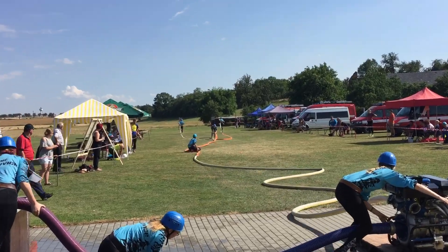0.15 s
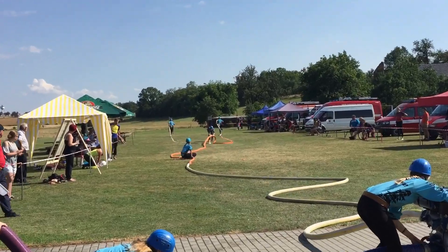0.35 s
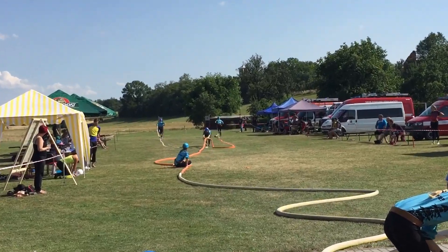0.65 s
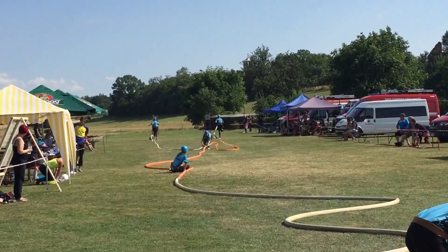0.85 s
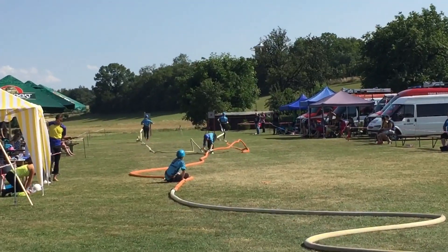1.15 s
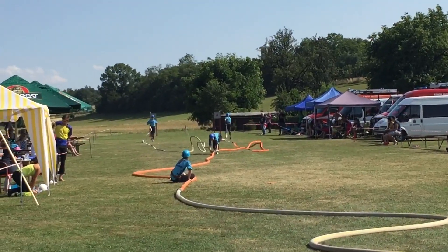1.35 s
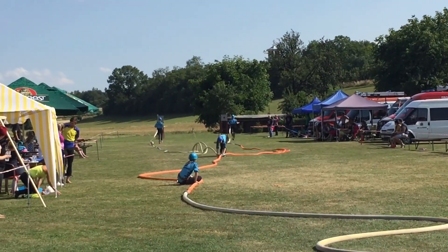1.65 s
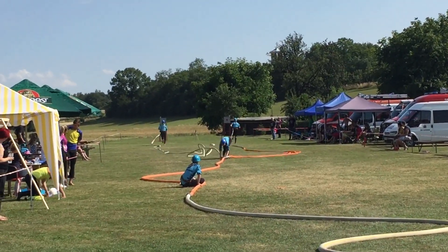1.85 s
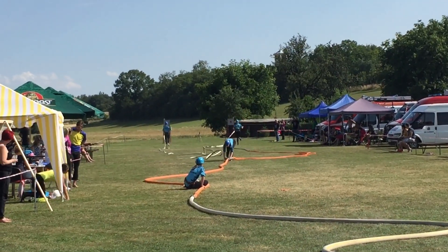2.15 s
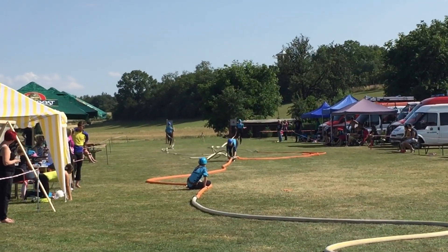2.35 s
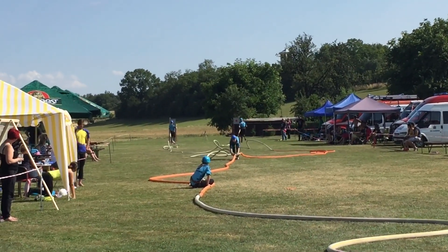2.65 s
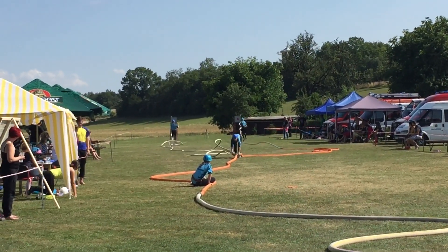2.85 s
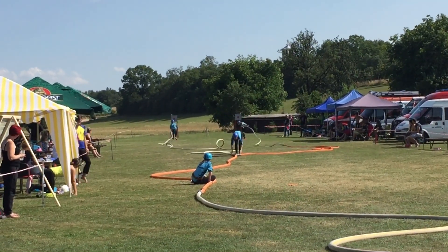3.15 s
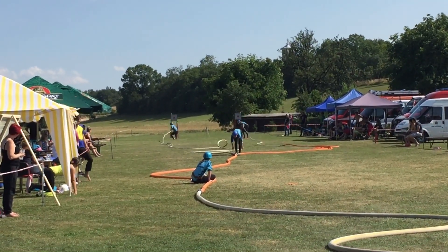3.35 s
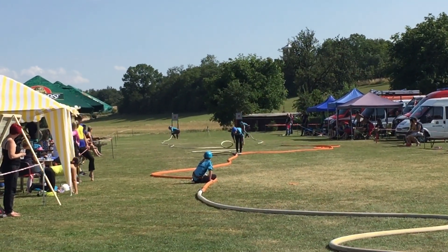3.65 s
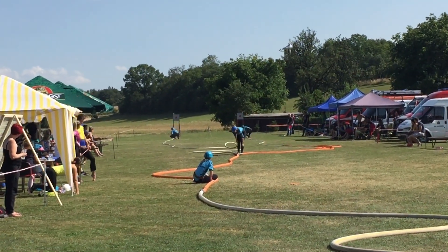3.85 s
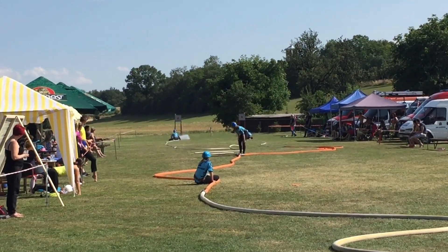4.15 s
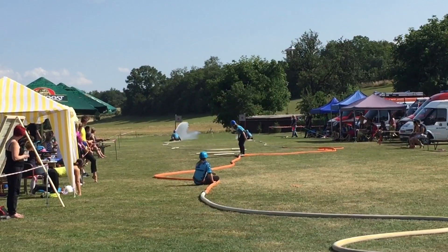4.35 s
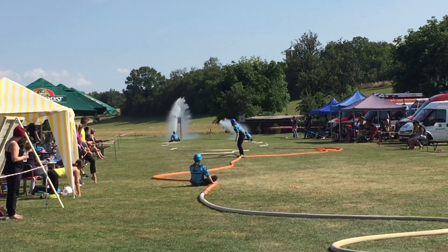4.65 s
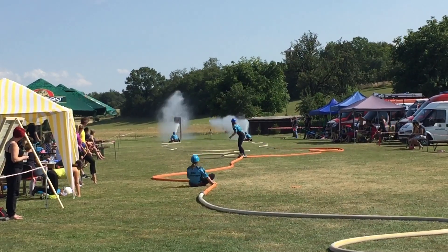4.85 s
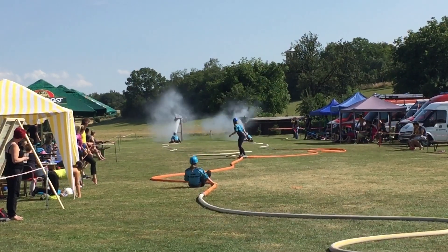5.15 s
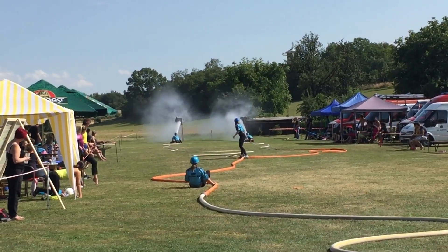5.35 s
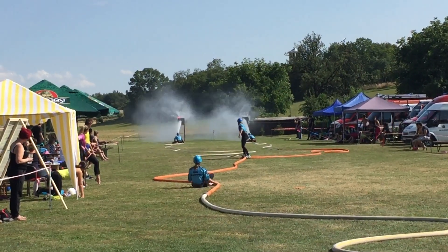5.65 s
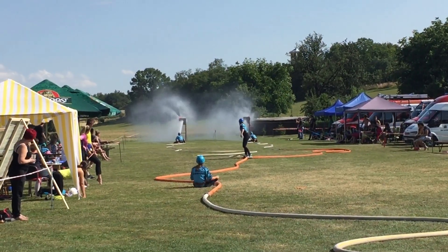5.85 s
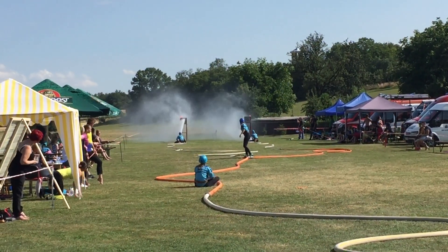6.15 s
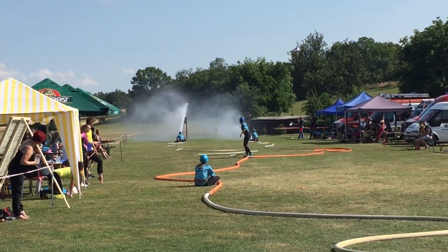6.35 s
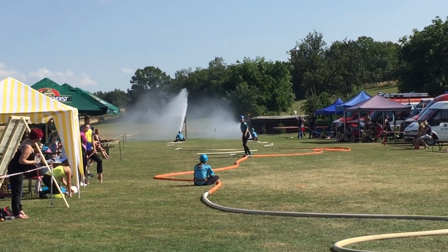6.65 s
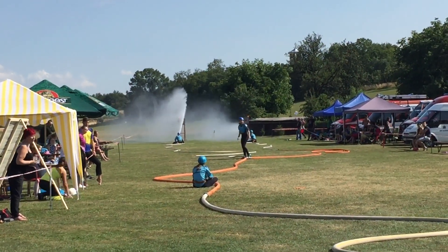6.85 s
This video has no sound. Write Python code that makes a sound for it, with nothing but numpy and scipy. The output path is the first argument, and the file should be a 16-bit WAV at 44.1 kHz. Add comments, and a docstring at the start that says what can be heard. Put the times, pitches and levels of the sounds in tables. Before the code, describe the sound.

Small petrol engine running fast in the open, steady rattling drone rising in pitch and loudness under load, air thumping the microphone, then sudden drop.

```python
"""A petrol fire pump with four cylinders runs hard in the open, pulls up to full load, then is throttled back.
Two exhaust puffs a turn make the drone, built from sine waves locked to the crankshaft.
Every firing knocks and rasps through the resonances of engine and frame, and valves tick between.
At full load gusts of air buffet the microphone; steady air noise from the silencer lies under it all."""
import sys
import numpy as np
from scipy import signal
from scipy.fft import rfft, irfft
from scipy.io import wavfile
from scipy.ndimage import uniform_filter1d

SR = 44100
rng = np.random.default_rng(int(sys.argv[2]) if len(sys.argv) > 2 else 0)


def log_audio(samples):
    """Write samples as a 16-bit WAV file to the path given in sys.argv[1]."""
    # one column per channel
    frames = np.atleast_2d(samples).T
    # limit to full scale, then quantise
    limited = np.clip(frames, -1, 1)
    pcm = np.round(limited * 32767).astype(np.int16)
    wavfile.write(sys.argv[1], SR, pcm)


N = 308259
TIME = np.arange(N) / SR  # seconds

# how fast the crankshaft spins: t/s, turns a second f/Hz
CRANK_SPEED = [(0.0, 63.06), (0.93, 64.54), (1.42, 64.26), (1.75, 63.45), (2.1, 67.4), (2.41, 68.47),
               (3.15, 70.2), (3.31, 70.56), (3.7, 67.3), (4.34, 67.17), (4.96, 73.98), (5.3, 76.9),
               (5.61, 79.04), (6.19, 79.72), (6.33, 76.4), (6.5, 71.9), (6.76, 68.3), (6.99, 65.3)]
# how hard the charges burn: t/s, effort level/dB
BURN_EFFORT = [(0.05, -17.5), (0.22, -18), (1.34, -18), (1.65, -20.5), (1.87, -17.5), (3.16, -17),
               (3.47, -18), (3.59, -21), (4.36, -19.5), (5.21, -11.5), (6.29, -13), (6.45, -23.5),
               (6.62, -23.5), (6.83, -27.5), (6.97, -23.5), (6.99, -24)]
# strong exhaust orders: multiple of crank speed, change with the throttle closed level/dB
STRONG_ORDERS = [(2, -3), (4, -7), (6, -4)]
# weaker exhaust orders: multiple of crank speed, then level/dB against order 4
# at light load, at full load, with the throttle closed
WEAK_ORDERS = [(1, -31.5, -17, -20), (3, -12, -19.5, -1.5), (5, -20.5, -16, -13), (7, -14.5, -39, -14),
               (8, -16.5, -19.5, -16), (10, -27, -13.5, -27), (12, -25.5, -36, -12), (13, -16, -31, -17),
               (14, -12.5, -22, -25), (17, -18, -11, -22)]
# resonances of the silencer, which the strong exhaust orders slide through: f/Hz, level/dB
SILENCER_RESONANCES = [(128, -5.5), (140, -4.5), (151, -5), (160, 0), (256, 1.15), (269, 1.06), (280, -2.5),
                       (305, -4.5), (319, 0.5), (382, -5.5), (403, -3), (420, -1), (457, -1), (478, -5.5)]
# cylinders in firing order: lateness at light load t/ms, blow at light load level/dB, at full load level/dB
CYLINDER_BLOWS = [(0.0044, 5.5, 5), (0.11, -0.5, -1), (0.065, 7.5, 3.5), (0.15, -5, -0.5)]
# resonances of engine block, silencer shell and frame: f/Hz, width f/Hz, level/dB
BLOCK_RESONANCES = [(682, 164, -3.5), (890, 66, -2), (1151, 150, -4), (1323, 73, -2.5), (1372, 114, -3.5),
                    (1765, 95, -5.5), (1973, 68, 0.5), (2388, 137, -0.9), (2647, 42, -2.5),
                    (3025, 160, -3.5), (3176, 230, -4.5), (3553, 170, -3), (3920, 61, -6),
                    (4540, 83, -12.5), (5093, 54, -11), (5580, 250, -10), (5935, 185, -5.5),
                    (6650, 210, -11), (7730, 100, -17), (8490, 136, -16), (9210, 240, -19),
                    (12130, 500, -22), (14600, 1100, -23.5)]
# spectrum of the air noise from the silencer: f/Hz, level/dB
AIR_SPECTRUM = [(20, -17), (50, -16), (110, -2.5), (250, 3), (420, 1), (560, -2), (900, -15), (2000, -34),
                (8000, -60)]
# pulses of air that thump the microphone, often one engine cycle apart: t/s, peak level/dB
AIR_THUMPS = [(4.903, -18), (5.323, -2), (5.347, -0.5), (5.373, -10), (5.489, -6.5), (5.590, -4.5),
              (5.615, -8), (5.681, -16), (5.718, -2.5), (5.768, -2), (5.792, -8), (5.831, -8), (5.869, -6),
              (5.894, -9), (5.918, -8), (5.942, -2), (6.020, -4), (6.069, -2), (6.094, -3), (6.110, -6),
              (6.171, -10), (6.203, -9), (6.26, -11)]
# spectrum of the turbulence around the thumps: f/Hz, level/dB
TURBULENCE_SPECTRUM = [(15, -36), (28, -10), (42, 0), (70, -8), (120, -7), (220, -7), (350, -20),
                       (600, -13), (1500, -61), (5000, -80)]

CRUISE_DB = -18  # burn effort at cruise
# the pump's load grows with the square of its speed, from none to full
NO_LOAD_HZ, FULL_LOAD_HZ = 58.6, 81.2
# the throttle is shut at this moment and the manifold empties
SHUT_S, EMPTYING_S = 6.23, 0.22
# each layer: level at cruising effort in dB, and dB gained per dB of effort
PIPE_DB, PIPE_RISE = -18.5, 0.41  # before the silencer's resonances
KNOCK_DB, KNOCK_RISE = -18, 0.94
CLATTER_DB, CLATTER_RISE = -21.5, 0.76
AIR_DB, AIR_RISE = -33.5, 0.18
CLATTER_SHUT_DB = -4  # change with the throttle closed
# turbulence around each thump: level against the thump, smoothing of its rise, dying away
SWIRL_DB, SWIRL_SMOOTHING_S, SWIRL_DECAY_S = -20, 0.02, 0.048
TOP_HZ = 15700  # no treble gets through above this


def exhaust(turns, crank_hz, effort_db, load, overrun):
    """Rounded puffs, two a turn, a quarter turn after each knock; an order swells as it meets a resonance."""
    pipe_db = PIPE_DB + PIPE_RISE * effort_db
    order_db = []
    for k, closed_db in STRONG_ORDERS:
        resonance_db = np.interp(round(k) * crank_hz, *np.transpose(SILENCER_RESONANCES))
        order_db.append(pipe_db + resonance_db + closed_db * overrun)

    # the puffs come slightly unevenly
    angle = 2 * np.pi * (turns - 0.24 + 0.00035 * walk(50))
    drone = 0
    for (k, _), db in zip(STRONG_ORDERS, order_db):
        drone = drone + undb(db + 0.06 * walk(30)) * np.cos(round(k) * angle)

    order_4_db = order_db[1]
    for k, light_db, full_db, closed_db in WEAK_ORDERS:
        open_db = light_db + (full_db - light_db) * load
        db = open_db * (1 - overrun) + closed_db * overrun
        drone = drone + undb(order_4_db + db + 0.68 * walk(14)) * np.cos(round(k) * angle)
    return np.sqrt(2) * drone  # each sine's level counts as rms


def firings(turns, load):
    """Times and strengths of the firings; under load the cylinders hit more alike and more punctually."""
    count = np.arange(int(2 * turns[-1]))  # two firings a turn
    times = np.interp(count / 2, turns, TIME)
    pull = np.interp(times, TIME, load)
    late_ms, light_db, full_db = np.array(CYLINDER_BLOWS)[count % len(CYLINDER_BLOWS)].T
    late_chance, blow_chance = rng.standard_normal((len(count), 2)).T
    times = times + (late_ms + 0.065 * late_chance) * (1 - 0.83 * pull) / 1000
    blow_db = light_db + (full_db - light_db) * pull + 0.39 * blow_chance
    return times, undb(blow_db)


def knock(blows, load, overrun):
    """Each firing rings the block and lets out a rasp of gas; pump and fan whirr on when the throttle shuts."""
    # the low thud is spread longer than the higher crack
    thud = steady(band(ring(scatter(blows, decay_s=0.0043)), 738, 1570))
    crack = steady(band(ring(scatter(blows, decay_s=0.0022)), 1503, 3970))
    gas = fade(blows, decay_s=0.0042) * rng.standard_normal(N)
    rasp = steady(band(ring(gas), 1250, 4000, order=2))
    whirr = steady(band(ring(rng.standard_normal(N)), 730, 4200))

    # only the balance between the parts matters: the mix is levelled at the end
    mix = undb(-2.5 - 1.4 * load) * thud
    mix = mix + undb(-5 + 4.75 * load) * crack
    mix = mix + undb(-1 - 10 * load) * rasp
    mix = mix + undb(-5.5 - 7 * load + 9 * overrun) * whirr
    return steady(mix)


def clatter(times, sizes, turns, load, overrun):
    """The bright, uneven side of each blow, with valves ticking late in every turn."""
    uneven_sizes = sizes ** 0.97 * undb(1.2 * rng.standard_normal(len(times)))
    bursts = fade(clicks(times, uneven_sizes), decay_s=0.0037)
    constant_hiss = undb(-10 + 9.5 * load + 13.5 * overrun)  # fills the gaps between bursts
    grit = steady(band(ring((bursts + constant_hiss) * rng.standard_normal(N)), 3930, 18400))

    ping = steady(band(ring(scatter(clicks(times, sizes), decay_s=0.0021)), 4500, 17700))

    valve_times = np.interp(np.arange(int(turns[-1])) + 0.68, turns, TIME)
    taps = clicks(valve_times, undb(5.5 * rng.standard_normal(len(valve_times))))
    valves = steady(band(fade(taps, decay_s=0.0029) * rng.standard_normal(N), 5800, 18000, order=2))
    return steady(grit + undb(-9 + 10 * load) * ping + undb(-16.5) * valves)


def pump_load(crank_hz):
    """Load 0-1: the water resists with the square of the speed."""
    return np.clip((crank_hz ** 2 - NO_LOAD_HZ ** 2) / (FULL_LOAD_HZ ** 2 - NO_LOAD_HZ ** 2), 0, 1)


def throttle_closed():
    """Overrun 0-1: the engine starves once the throttle is shut."""
    return 1 - np.exp(-np.maximum(TIME - SHUT_S, 0) / EMPTYING_S)


def buffets():
    """Each pulse of air is a quick push and a slow suck on the microphone, with low turbulence around it."""
    times, peak_db = np.transpose(AIR_THUMPS)
    pulses = clicks(times, undb(peak_db))
    push = band(signal.unit_impulse(4096), 40, 230, order=1)
    push = signal.sosfilt(signal.butter(2, 480, fs=SR, output="sos"), push)
    thumps = signal.fftconvolve(pulses, push / push.max())[:N]
    swirl = uniform_filter1d(fade(pulses, decay_s=SWIRL_DECAY_S), int(SWIRL_SMOOTHING_S * SR))
    turbulence = steady(noise(TURBULENCE_SPECTRUM), size=2500)
    return thumps + undb(SWIRL_DB) * swirl * turbulence


def silencer_air(effort_db):
    """Rushing air is noise with a fixed spectrum, slightly louder when the engine works harder."""
    return undb(AIR_DB + AIR_RISE * effort_db) * noise(AIR_SPECTRUM)


def ring(x, size=4096):
    """Pass a force through the resonances of the block, which answer at once and then die away."""
    f = np.fft.rfftfreq(size, 1 / SR) + 1  # +1 avoids dividing by zero
    power = 0
    for hz, width, db in BLOCK_RESONANCES:
        power = power + undb(2 * db) / (1 + ((f * f - hz * hz) / (f * width)) ** 2)
    # keeping half the cepstrum puts the energy as early as possible (minimum phase)
    cepstrum = irfft(np.log(power))[:size // 2]
    cepstrum[0] /= 2
    response = irfft(np.exp(rfft(cepstrum, size)))
    return signal.fftconvolve(x, response)[:N]


def scatter(x, decay_s, size=1024):
    """Many short paths through the metal spread each blow in time without colouring it."""
    paths = rfft(rng.standard_normal(size) * np.exp(-np.arange(size) / (decay_s * SR)))
    lead = size // 8  # room for the part that falls before the blow
    spread = np.roll(irfft(paths / abs(paths)), lead)  # all pitches equally strong
    return signal.fftconvolve(x, spread)[lead:lead + N]


def clicks(times, sizes):
    """One click at each time, shared between two samples."""
    at = np.clip(times * SR, 0, N - 2)
    i = at.astype(int)
    return np.bincount(i, sizes * (1 - at + i), N) + np.bincount(i + 1, sizes * (at - i), N)


def fade(x, decay_s):
    """Give every click an exponential tail."""
    return signal.lfilter([1], [1, -np.exp(-1 / (decay_s * SR))], x)


def noise(spectrum):
    """Noise with an rms of 1, shaped by a spectrum of (Hz, dB) points."""
    hz, db = np.transpose(spectrum)
    f = np.fft.rfftfreq(N, 1 / SR) + 1
    gain = undb(np.interp(np.log(f), np.log(hz), db))
    x = irfft(rfft(rng.standard_normal(N)) * gain, N)
    return x / x.std()


def band(x, lo_hz, hi_hz, order=4):
    """Keep only the pitches between two limits; a higher order cuts more steeply."""
    limits = [lo_hz, min(hi_hz, SR / 2 - 1)]
    return signal.sosfilt(signal.butter(order, limits, "band", fs=SR, output="sos"), x)


def steady(x, size=4000):
    """Hold the running rms near 1, averaged over about this many samples."""
    power = uniform_filter1d(uniform_filter1d(x ** 2, size), size)
    return x / np.sqrt(power + 1e-12)


def walk(rate_hz):
    """Random wander: straight lines between random points, this many a second."""
    return np.interp(TIME * rate_hz, np.arange(4096), rng.standard_normal(4096))


def curves(table):
    """The columns of a timed table, one value a sample."""
    times, *columns = np.transpose(table)
    return [np.interp(TIME, times, column) for column in columns]


def undb(db):
    """Decibels to gain."""
    return 10 ** (np.asarray(db) / 20)


def scene():
    """Crank speed and effort drive every part of the engine; air noise and buffets are added."""
    crank_hz = curves(CRANK_SPEED)[0]
    effort_db = curves(BURN_EFFORT)[0] - CRUISE_DB  # 0 dB at cruise
    load, overrun = pump_load(crank_hz), throttle_closed()
    turns = np.cumsum(crank_hz) / SR
    times, sizes = firings(turns, load)
    knock_db = KNOCK_DB + KNOCK_RISE * effort_db
    clatter_db = CLATTER_DB + CLATTER_RISE * effort_db + CLATTER_SHUT_DB * overrun
    engine = exhaust(turns, crank_hz, effort_db, load, overrun)
    engine = engine + undb(knock_db) * knock(clicks(times, sizes), load, overrun)
    engine = engine + undb(clatter_db) * clatter(times, sizes, turns, load, overrun)
    return (engine + silencer_air(effort_db) + buffets())[None]


def record(dry):
    """The phone drops the deepest bass, rounds peaks near full scale and cuts the top."""
    no_deep_bass = signal.sosfilt(signal.butter(4, 30, "high", fs=SR, output="sos"), dry)
    rounded = no_deep_bass / (1 + (no_deep_bass / 0.93) ** 8) ** (1 / 8)
    return signal.sosfilt(signal.ellip(10, 0.1, 80, TOP_HZ, fs=SR, output="sos"), rounded)


dry = scene()
out = record(dry)
log_audio(out)
```